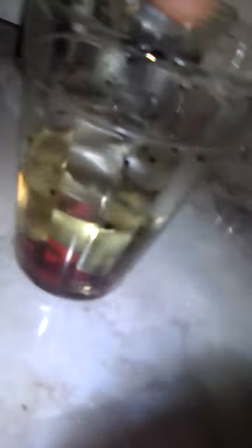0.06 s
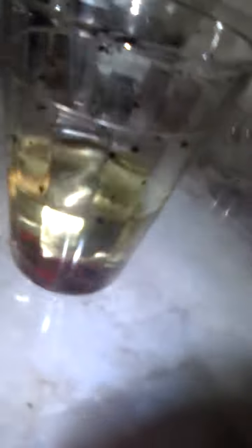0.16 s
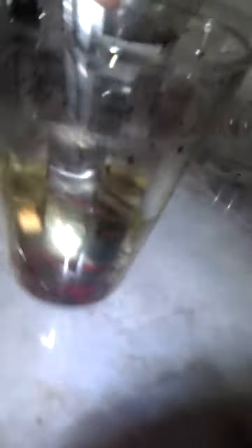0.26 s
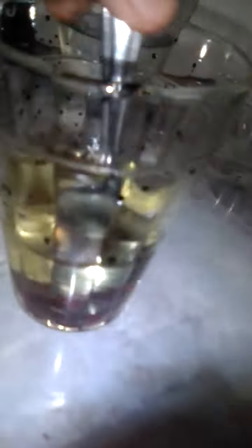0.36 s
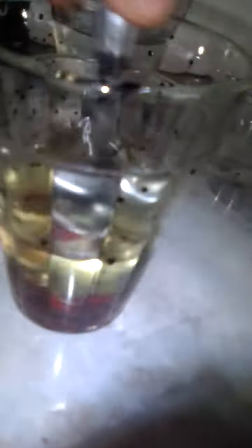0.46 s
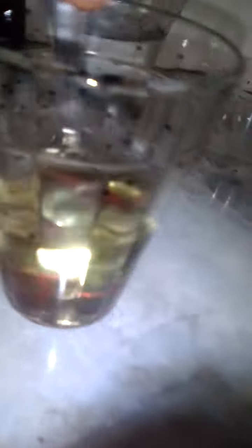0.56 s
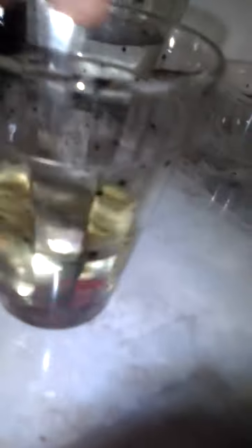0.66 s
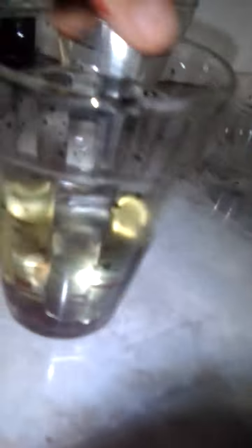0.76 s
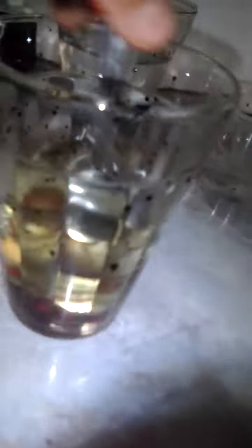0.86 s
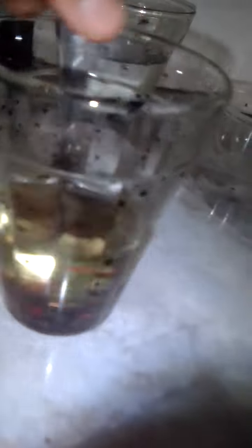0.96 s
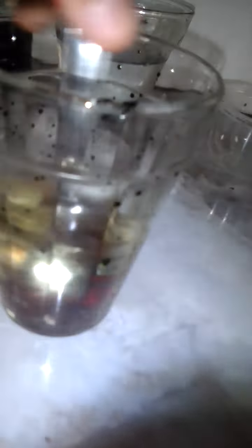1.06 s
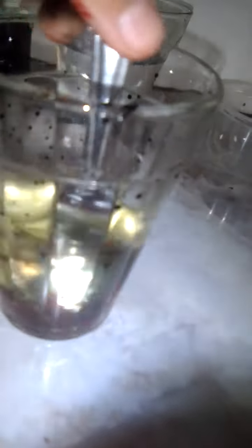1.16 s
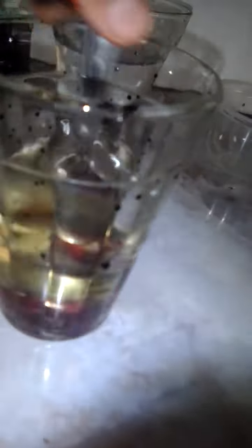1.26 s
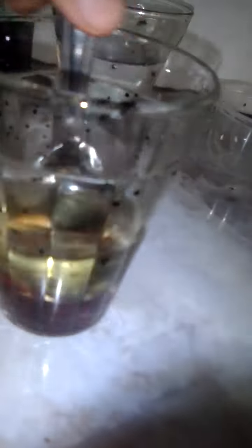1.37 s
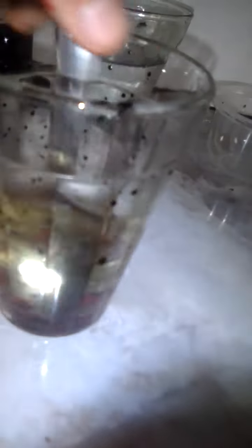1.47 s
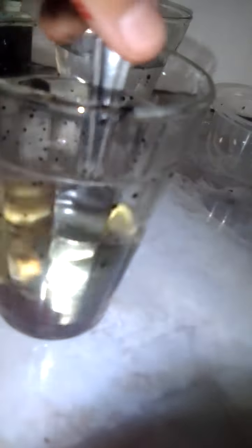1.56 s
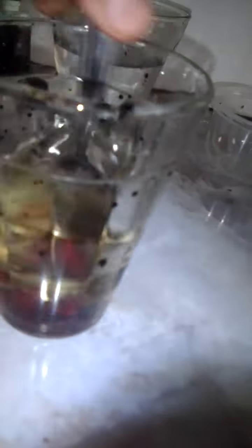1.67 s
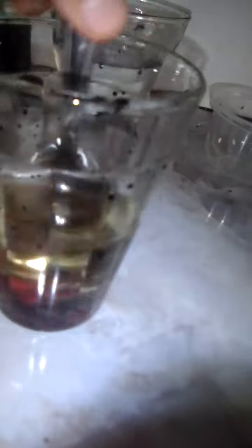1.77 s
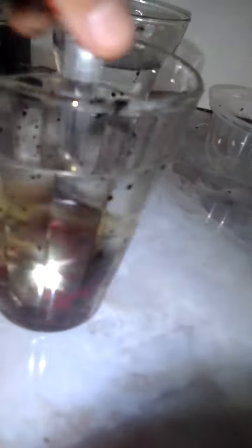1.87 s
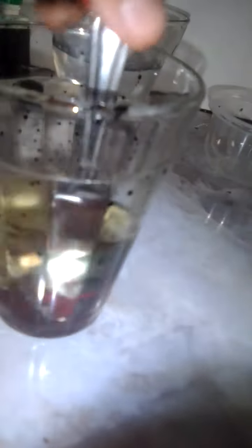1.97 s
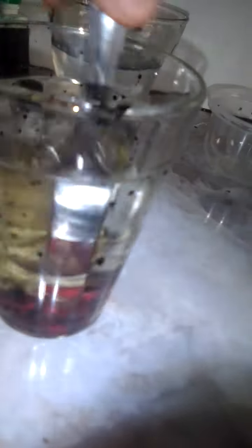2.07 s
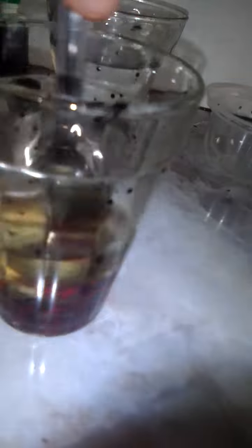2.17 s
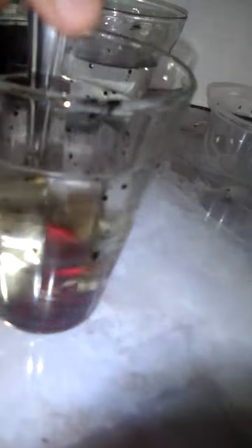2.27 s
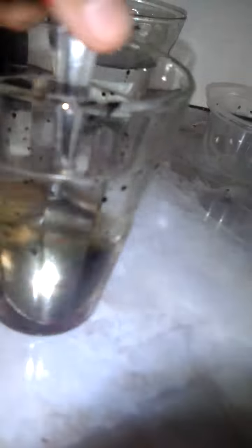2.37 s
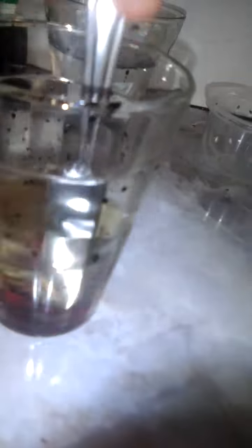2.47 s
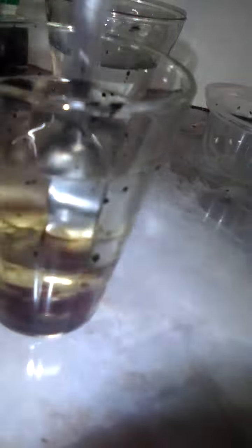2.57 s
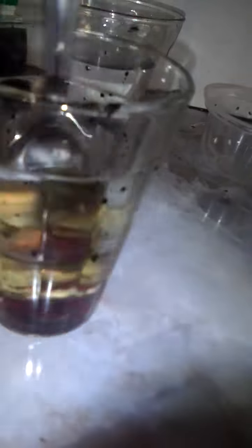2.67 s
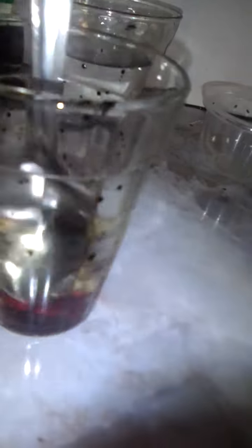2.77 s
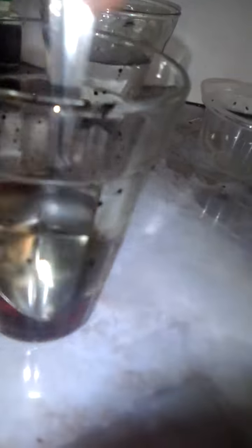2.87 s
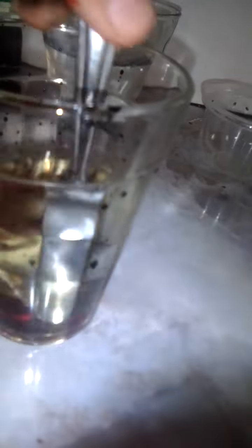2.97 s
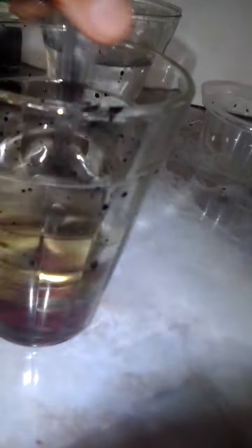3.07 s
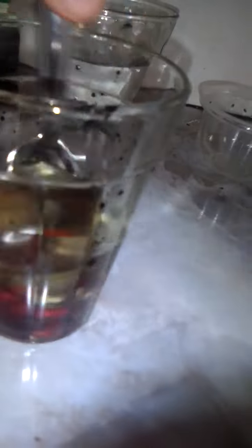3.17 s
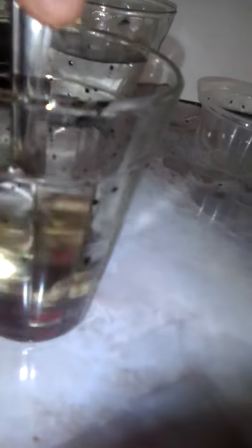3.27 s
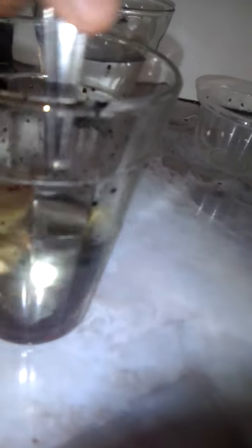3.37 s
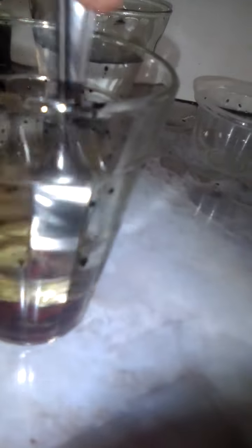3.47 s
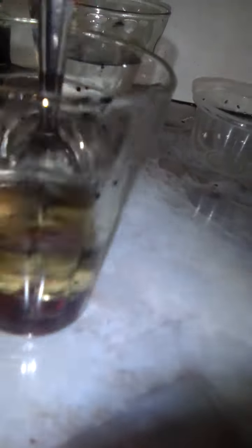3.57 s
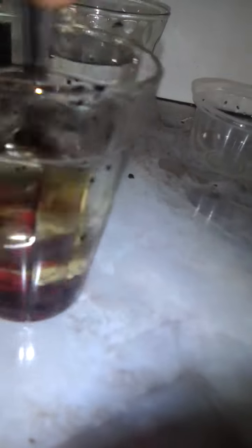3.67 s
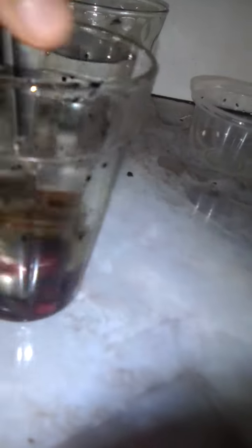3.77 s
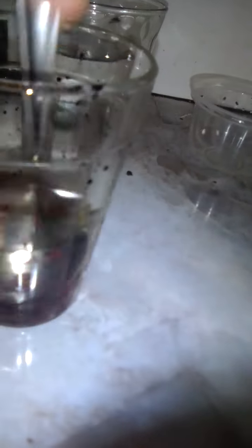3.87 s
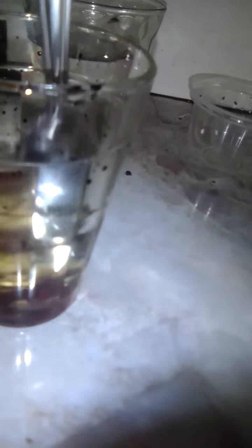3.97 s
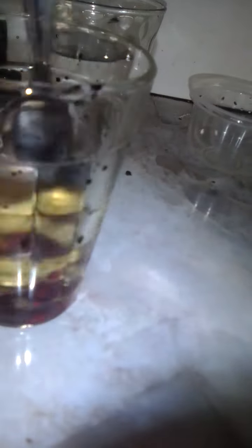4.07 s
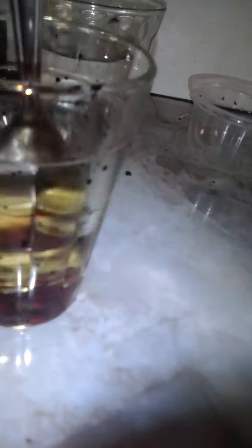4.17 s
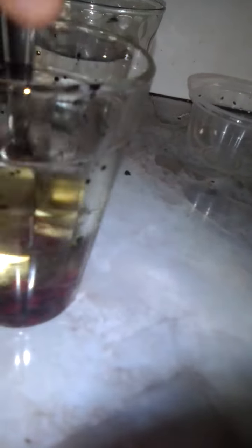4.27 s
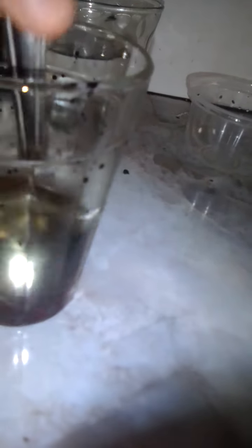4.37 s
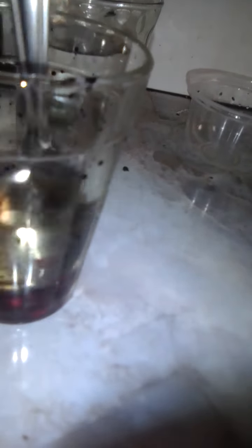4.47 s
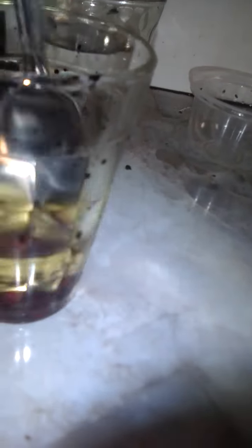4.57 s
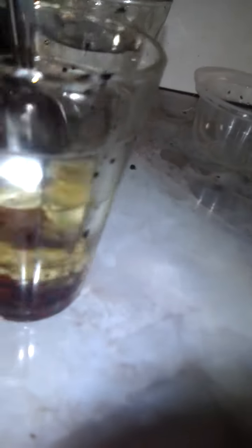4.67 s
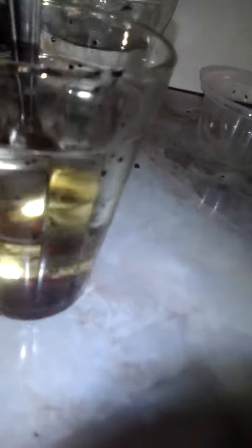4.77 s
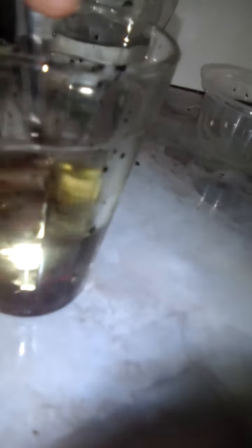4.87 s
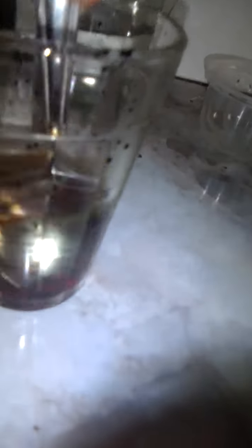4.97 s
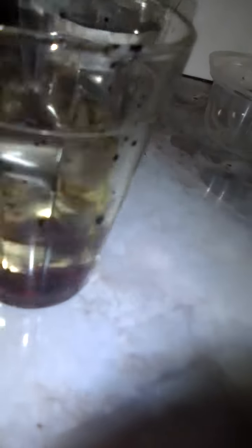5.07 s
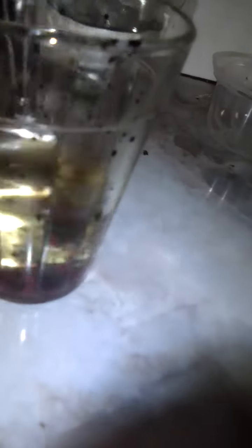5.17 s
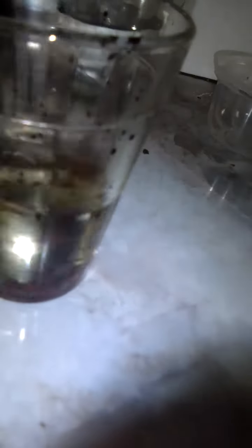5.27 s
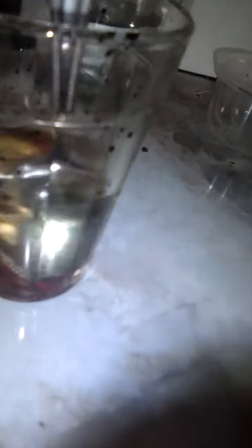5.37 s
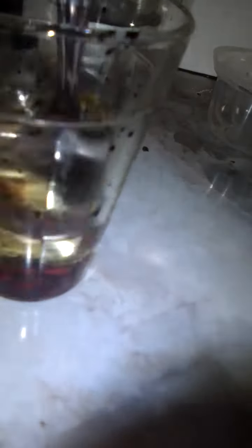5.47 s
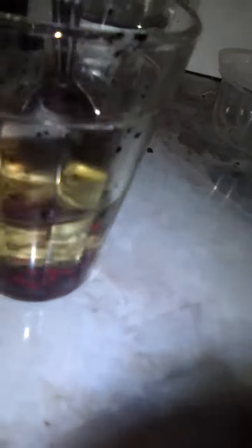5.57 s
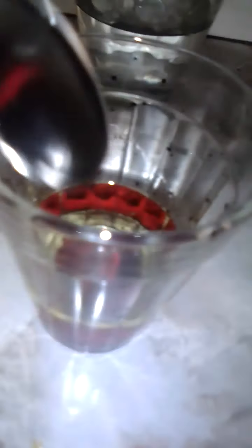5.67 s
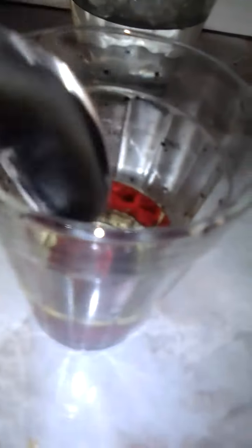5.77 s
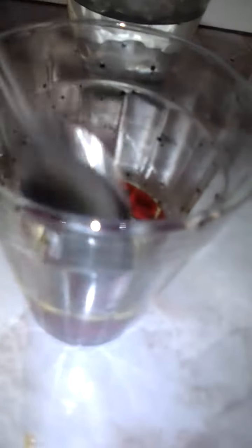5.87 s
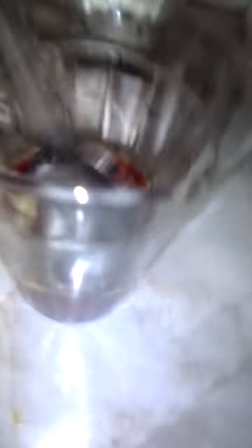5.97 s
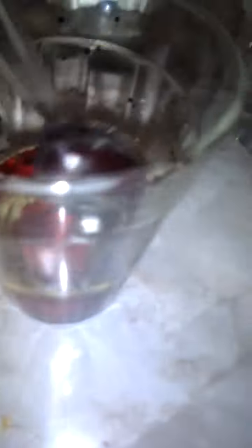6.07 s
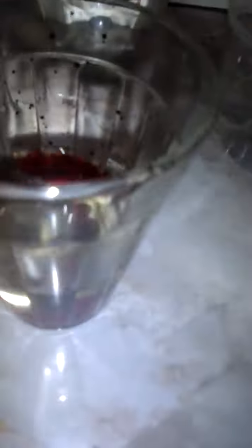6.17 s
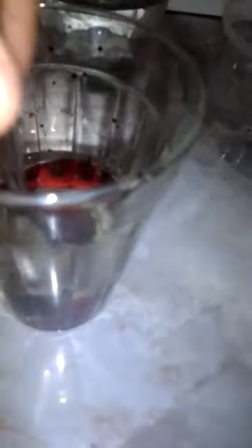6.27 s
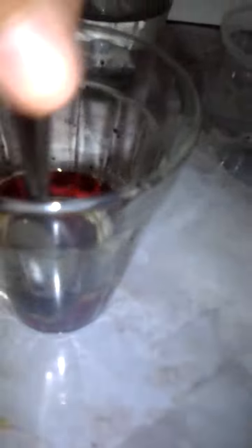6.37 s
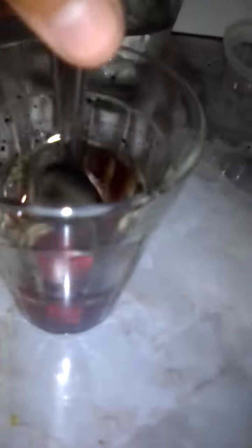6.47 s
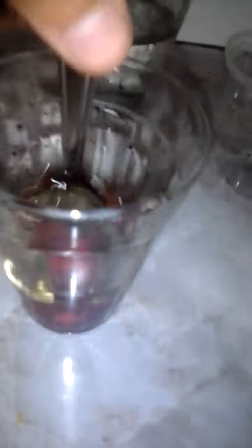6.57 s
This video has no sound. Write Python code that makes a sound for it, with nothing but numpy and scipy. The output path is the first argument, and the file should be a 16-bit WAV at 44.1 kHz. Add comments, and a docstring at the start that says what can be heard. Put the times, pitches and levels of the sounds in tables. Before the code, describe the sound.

A brief scrape opens, then a steel spoon stirs a drink in a thick glass tumbler, making bright, uneven clinks, each with a small knock and a short glassy ring. Clear strikes come at about 0.3, 0.5, 0.8, 1.6 and 2 seconds, with lighter ticks and faint scrapes between. The liquid swirls softly with small plops, most active in the first two seconds, then easing. The sharpest clink lands at 2.9 seconds, followed by others at 3.4 and 3.9, and a tiny, faint squeak near 4.1. Strong clinks return at 4.5, 5.1 and 5.2 seconds, with a soft thump just before 5. A slightly longer scrape near 5.7 seconds leads to final clinks at about 6, 6.3 and 6.6. The sound is close, in a small, slightly reverberant room with quiet background noise and a faint low hum.

```python
"""A brief scrape, then bright, uneven clinks: a steel spoon stirs a drink in a thick tumbler on a table.
Each impact excites the normal modes of both bodies: a short ring of the spoon, a knock of the tumbler
and the longer notes of its wall. Between blows the drink swirls and plops as bubbles resonate, and
stick-slip friction makes the spoon scrape and once squeak. All this sounds close to a phone in a small,
slightly reverberant room, over quiet noise and a low hum."""
import sys
import numpy as np
from scipy import signal
from scipy.fft import rfft, irfft
from scipy.io import wavfile
from scipy.ndimage import uniform_filter1d, minimum_filter1d

SR = 44100
rng = np.random.default_rng(int(sys.argv[2]) if len(sys.argv) > 2 else 0)


def persist_wave(psi):
    """Save psi, clipped to +-1, as 16-bit WAV."""
    counts = np.round(np.clip(psi, -1, 1) * 32767).astype(np.int16)
    wavfile.write(sys.argv[1], SR, np.atleast_2d(counts).T)


N = 291942
TIME = np.arange(N) / SR
AGE = np.arange(int(.42 * SR)) / SR  # time since an excitation, t/s

# vigour of the stirring, easing off: t/s, level/dB
SWIRL = [(0, -52.5), (2.3, -56.5), (4.6, -60.5), (6.62, -61.5)]


def clinks():
    """Impact excitation: the spoon strikes, touches again lightly, and twice thumps the table."""
    # t/s, spoon f/Hz, contact note f/Hz, then level/dB of spoon, knock, low and middle wall notes
    blows = [(0.068, 7390, 1466, -40, -38.5, -71, -44.5), (0.3347, 6690, 3450, -20.5, -46, -44, -32),
             (0.345, 6530, 3430, -29.5, -31.5, -40, -29), (0.501, 7190, 1230, -24, -36, -51, -39.5),
             (0.808, 6533, 5660, -15.5, -26.5, -36, -27), (0.887, 6660, 1660, -41, -52, -59, -56),
             (1.016, 7120, 1770, -44, -50, -52, -45.5), (1.08, 6800, 1240, -47.5, -48.5, -57, -50),
             (1.175, 6720, 2626, -31.5, -28.5, -48, -34), (1.311, 7130, 1772, -51, -48, -52.5, -42.5),
             (1.558, 7040, 3440, -52.5, -37.5, -56, -44.5), (1.603, 6840, 3460, -26, -24, -37, -24.5),
             (1.751, 6630, 2780, -55, -55, -55, -54), (1.9216, 7350, 4880, -31.5, -34.5, -61, -30.5),
             (1.994, 6540, 3260, -17.5, -24.5, -33, -29), (2.433, 6490, 5260, -29.5, -33, -45, -41.5),
             (2.565, 6910, 3690, -38, -59, -60, -44.5), (2.9014, 6600, 5630, -8.5, -30, -34.5, -29.5),
             (3.035, 7300, 1740, -41.5, -53, -78, -42), (3.152, 6640, 1750, -56, -62, -61, -68),
             (3.276, 6530, 5600, -52, -65, -70, -67), (3.433, 6550, 1570, -18, -31.5, -36.5, -35),
             (3.78, 6900, 1750, -58, -55, -60, -58.5), (3.8629, 6610, 5680, -22.5, -55, -55, -36),
             (3.8748, 6600, 1255, -31.5, -23.5, -44, -32), (4.052, 6830, 1600, -50.5, -58, -59, -46),
             (4.329, 5360, 5600, -49, -48, -63, -67.5), (4.369, 7000, 5400, -62, -61.5, -73, -63.5),
             (4.4916, 6560, 5760, -12, -39.5, -39.5, -26), (4.622, 7200, 1770, -59, -57, -69, -66),
             (4.962, 6860, 1563, -34.5, -32, -63.5, -60), (5.0521, 6620, 6000, -15, -43, -45.5, -27.5),
             (5.2024, 6566, 2662, -12, -37, -38, -24), (5.385, 6360, 5420, -32.5, -28, -58, -36.5),
             (5.456, 6740, 987, -38, -52, -61, -49), (5.9959, 6750, 1751, -19.5, -39, -64, -32),
             (6.2572, 6960, 1780, -14.5, -36.5, -35, -14), (6.3267, 7490, 1228, -21.5, -24, -65, -42),
             (6.5749, 6550, 1656, -18, -42, -37.5, -24)]
    thumps = [(1.9214, -47.5), (4.962, -37.5)]  # the spoon lands on the bottom: t/s, level/dB
    table_modes = [(273, 0, 0.13)]  # f/Hz, level/dB, t60/s
    retouch_db = -38
    out = np.zeros(N)
    for s, spoon_hz, contact_hz, *levels_db in blows:
        add(out, s, clink(s, spoon_hz, contact_hz, *levels_db))
        again_s = s + .07 + .07 * rng.random()
        add(out, again_s, clink(again_s, spoon_hz, contact_hz, *np.add(levels_db, retouch_db)))
    for s, db in thumps:
        add(out, s, blow(ring(table_modes, scatter_db=0, detune=0.0091), db))
    return out


def clink(s, spoon_hz, contact_hz, spoon_db, knock_db, low_db, mid_db):
    """Superposition in one impact: steel, tumbler and contact sound briefly, and the wall rings on."""
    force_db = knock_db + .25 * (spoon_db - knock_db)
    # a harder blow is a shorter contact, so its treble grows faster; later blows are brighter too
    growth_db_per_db, brighten_db_per_s = 1.335, 3
    sharp_db = growth_db_per_db * spoon_db + brighten_db_per_s * s
    attack = spoon_ring(spoon_hz, spoon_db) + knock(knock_db) + contact(contact_hz, force_db, sharp_db)
    return attack + wall_ring(s, spoon_db, knock_db, low_db, mid_db, sharp_db)


def spoon_ring(hz, level_db):
    """Bending modes of a bar: grip and depth in the drink set the pitch; the grip varies the damping."""
    bending = [(1, 6.5, 0.78), (1.022, -18, 0.47), (.972, -20.5, 0.51), (1.1, -12.5, 0.97), (.92, -12, 0.5)]  # frequency ratio, level/dB, t60 ratio
    t60 = 0.051 * np.exp(.15 * rng.standard_normal())
    modes = [(hz * ratio, db, t60 * share) for ratio, db, share in bending]
    steel = ring(modes, scatter_db=6, detune=0.0013) * onset(.0004)
    rebound_s = .009 * (.8 + .4 * rng.random())
    rebound = undb(-13) * np.pad(steel, (int(rebound_s * SR), 0))[:len(AGE)]
    return blow(steel + rebound, level_db + .5)


def knock(db):
    """Heavily damped resonance of the tumbler with its drink and the air above it."""
    modes = [(708, 3, 0.03), (677, 2.5, 0.028), (752, -6.5, 0.059), (297, -25, 0.018)]  # f/Hz, level/dB, t60/s
    colour = [(60, -39.5), (150, -32), (260, -2), (520, 1), (720, -1.5), (900, -2), (1150, -3.5),
              (1600, -36)]  # impact noise: f/Hz, level/dB
    body = ring(modes, scatter_db=2, detune=.033) * onset(.004)
    return blow(body, db - 0.5) + blow(burst(colour, t60=0.068, rise_s=0.00028), db - 6.0)


def contact(hz, force_db, sharp_db):
    """A short force pulse excites a broad band; the point of contact favours one damped note."""
    clack_colour = [(500, -31), (950, -6.5), (1280, 7.5), (1600, 1), (2300, 0), (2800, 0), (3350, 4.5),
                    (4200, -1.5), (5300, 3.5), (6200, 4.5), (7400, 7.5), (8200, -25.5), (9500, -36.5),
                    (16000, -48.5)]  # f/Hz, level/dB
    tick_colour = [(3000, -14), (6500, 2.5), (8400, 10), (9500, -9.5), (11000, 5), (13000, -20),
                   (16000, -9)]  # f/Hz, level/dB
    note = blow(ring([(hz, 0, 0.044)], scatter_db=0, detune=0.0023), force_db - 7)
    clack = blow(burst(clack_colour, t60=0.035, rise_s=0.00024), force_db + 0.5)
    tick = blow(burst(tick_colour, t60=0.012, rise_s=.0001), sharp_db - 29)
    return note + clack + tick


def wall_ring(s, spoon_db, knock_db, low_db, mid_db, sharp_db):
    """Shell modes under mass loading: drink heaped by a blow flattens them until it falls away."""
    # modes of the glass, several in close pairs: f/Hz, level/dB, t60/s
    low = [(1735, -3.5, 0.51), (1756, 10, 0.087)]
    middle = [(4552, 0, 0.24), (4538, -0.5, 0.16), (3470, -23.5, 0.15)]
    high = [(7315, -1, .22), (7365, -6, .22), (7170, -6, .13), (6530, 0, .2), (6690, -7, .18)]
    top = [(8480, -1, .12), (10600, -15, .1), (10990, -15, .13)]
    rim = [(1742, 9, 0.062), (2000, 4, 0.02), (2650, -8, 0.049), (3110, -1, .05), (7000, -12, 0.2)]
    groups = [(low, low_db), (middle, mid_db),
              (high, (spoon_db + mid_db) / 2 - 13.5), (top, sharp_db - 32.5)]
    sag = .01 * (1 + .5 * rng.standard_normal()) / (1 + undb(-27 - spoon_db))  # share of the pitch
    if 5.6 < s < 6.3:  # lifted out of the drink, the spoon hits near the rim
        groups.append((rim, mid_db - 2))
        sag = 0
    damping = 1 + undb(knock_db + 9.5)  # a heavy knock presses the spoon against the wall
    notes = [(hz * (1.005 - sag), db + level_db, t60 / damping)
             for modes, level_db in groups for hz, db, t60 in modes]
    return ring(notes, scatter_db=3.5, detune=0.0016, glide=sag) * onset(0.0036)


def drink():
    """Bubble resonance and flow noise: a fine wash swells with each wave, among a few larger plops."""
    plop_events = [(0.408, -42), (0.462, -41), (1.132, -43), (1.485, -39.5), (1.906, -39), (2.37, -46),
                   (2.789, -48.5), (3.639, -38.5)]  # behind the spoon: t/s, level/dB
    sloshes = [(.35, .22, -52), (.67, .13, -50.5), (.88, .4, -54), (2.92, .2, -61.5), (3.65, .16, -48)]  # waves running round the glass: t/s, duration/s, level/dB
    wash_colour = [(100, -27.5), (300, 1), (720, 1), (1000, -1), (1400, -2.5), (2300, -15.0),
                   (5000, -30.5), (12000, -59.0)]  # f/Hz, level/dB
    bubbles, plops, flow = np.zeros(N), np.zeros(N), undb(curve(SWIRL))
    for when, pitch, size in rng.random((900, 3)):
        strength = undb(16 * size ** 3 - 5 * pitch)
        add(bubbles, when * N / SR, strength * bubble(380 * 5 ** pitch, cycles=2.1, glide=0.099))
    for s, db in plop_events:
        plop_hz = 705 * (1 + .04 * rng.standard_normal())
        add(plops, s, blow(bubble(plop_hz, cycles=27, glide=.1), db))
        splash = burst(wash_colour, t60=0.17, rise_s=0.00015)
        add(plops, s, blow(splash, db - 2))
    for s, length, db in sloshes:
        add(flow, s, undb(db) * swell(length, peak_share=.45))
    return flow * (undb(-9) * unit(bubbles) + undb(-7) * noise(wash_colour, size=N)) + plops


def bubble(hz, cycles, glide):
    """A pocket of air is a damped oscillator whose pitch rises as it nears the surface."""
    life = cycles / hz
    t = AGE[:int(life * SR) + 2]
    return np.sin(2 * np.pi * hz * t * (1 + glide * t / life / 2)) * np.exp(-np.log(1000) * t / life)


def scrape():
    """Stick-slip friction: a light touch rings mainly the steel, a firm one also the damped wall."""
    slides = [(0, 0.055, -47.5), (.56, 0.053, -55), (0.938, 0.053, -49), (2.339, 0.05, -54),
              (2.568, 0.052, -48.5), (2.798, 0.025, -51), (3.326, 0.049, -52.5), (3.516, .012, -42),
              (5.661, 0.16, -37.5)]  # t/s, duration/s, level/dB
    # resonances of the rubbed tumbler and spoon: f/Hz, bandwidth/Hz, level/dB
    wall_modes = [(700, 240, 1), (2090, 700, -4), (4640, 190, 5.5), (8520, 300, -15), (11050, 300, -20)]
    steel_modes = [(6700, 260, -4.5), (7240, 220, -4)]
    slips_per_s, firm_db = 1200, -45.5
    unsteady = noise([(1, -4.5), (12, 1), (40, -8), (200, -89.5)], size=N)
    pressure = undb(curve(SWIRL) - 9.5 + 4.5 * unsteady)  # uneven grazing between slides
    for s, length, db in slides:
        add(pressure, s, undb(db) * swell(length, peak_share=0.87))
    slips = pressure * unit((rng.random(N) < slips_per_s / SR) * rng.standard_normal(N))
    firmness = pressure / (pressure + undb(firm_db))
    wall, steel = resonances(wall_modes), resonances(steel_modes)
    spectrum = rfft(slips * firmness) * wall + rfft(slips) * steel
    return irfft(spectrum, N) / np.sqrt(np.mean(np.abs(wall + steel) ** 2))


def squeak():
    """Self-excited oscillation: slips on the wet wall lock into a rising tone that keeps losing grip."""
    start_s, start_hz, rise_hz_per_s = 4.075, 3220, 5500
    grip = swell(.08, peak_share=0.52)
    wobble = noise([(100, 8), (300, 1), (1500, -48)], size=len(AGE))
    stutter = noise([(20, -2), (60, 0), (200, -41)], size=len(AGE))
    hz = (start_hz + rise_hz_per_s * AGE) * (1 + 0.03 * wobble)
    phase = 2 * np.pi * np.cumsum(hz) / SR
    tone = unit(stutter * (np.sin(phase) + undb(-1.0) * np.sin(2 * phase)))
    out = np.zeros(N)
    add(out, start_s, undb(-53) * grip * tone[:len(grip)])
    return out


def room(x):
    """Reverberation: reflections from the table and near walls merge into a short, thin tail."""
    # f/Hz, level/dB
    colour = [(100, 7.5), (700, 0.5), (1500, 6.5), (3500, 1.0), (7000, -6), (10000, -3.5), (16000, -21)]
    tail = burst(colour, t60=0.32, rise_s=0.0033) * (AGE > .003)
    return x + undb(-20) * signal.fftconvolve(x, tail / np.sqrt(np.sum(tail ** 2)))[:N]


def background():
    """Broadband room noise and a low hum in the house, randomly modulated in pitch and amplitude."""
    air_colour = [(15, -52), (25, -24), (145, -4.5), (335, -2.5), (476, -8), (677, -8), (936, -20.5),
                  (1940, -20), (4140, -24), (4740, -21), (6210, -25.5), (16000, -36)]  # f/Hz, level/dB
    hum_levels = [(0, -69.5), (1.6, -60.5), (2.7, -72), (6.62, -72.5)]  # the hum swells and fades back: t/s, level/dB
    waver = noise([(1, 3.5), (6, -5.5), (25, -30), (100, -97.5)], size=N)
    hum_hz = 143 + 3 * waver
    hum = unit(np.sin(2 * np.pi * np.cumsum(hum_hz) / SR) * (1 + 0.33 * waver[::-1]))
    return undb(-59.5) * noise(air_colour, size=N) + undb(curve(hum_levels)) * hum


def ring(modes, scatter_db, detune, glide=0):
    """Free decay of modes (f/Hz, level/dB, t60/s): impact point sets strength, the drink bends pitch."""
    out, rise = 0, glide * (1 - np.exp(-(AGE / 0.11) ** 2))
    for hz, db, t60 in modes:
        size, shift, bend, sign = rng.standard_normal(4)
        pitch_ratio = 1 + rise + detune * (shift + bend * np.sin(2 * np.pi * 7 * AGE))
        phase = 2 * np.pi * hz * np.cumsum(pitch_ratio) / SR
        out = out + np.sign(sign) * undb(db + scatter_db * size) * fade(t60) * np.sin(phase)
    return out


def resonances(modes):
    """Frequency response of parallel modes, each a squared second-order band-pass."""
    f = np.maximum(np.fft.rfftfreq(N, 1 / SR), 1)
    return sum(undb(db) / (1 + 1j * hz / width * (f / hz - hz / f)) ** 2 for hz, width, db in modes)


def burst(colour, t60, rise_s):
    """Modal overlap: damped modes too dense to tell apart sound as decaying noise."""
    return noise(colour, size=len(AGE)) * fade(t60) * onset(rise_s)


def noise(colour, size):
    """Noise of unit RMS, filtered to a spectrum (f/Hz, level/dB)."""
    hz, db = np.transpose(colour)
    f = np.maximum(np.fft.rfftfreq(size, 1 / SR), 1)
    gain = undb(np.interp(np.log(f), np.log(hz), db))
    return unit(irfft(rfft(rng.standard_normal(size)) * gain, size))


def swell(length, peak_share):
    """Envelope of a push that builds to its peak and lets go."""
    t = np.linspace(0, 1, max(int(length * SR), 2))
    return np.sin(np.pi / 2 * np.interp(t, [0, peak_share, 1], [0, 1, 0]))


def onset(rise_s):
    """Exponential approach to full amplitude."""
    return 1 - np.exp(-AGE / rise_s)


def fade(t60):
    """Exponential decay by 60 dB in t60 seconds."""
    return np.exp(-np.log(1000) * AGE / max(t60, 1e-3))


def blow(x, db):
    """Set a short sound's level as if all its energy lay within 15 ms."""
    return x * undb(db) / np.sqrt(np.sum(x ** 2) / (.015 * SR))


def curve(table):
    """Linear interpolation of (t/s, level/dB) points."""
    return np.interp(TIME, *np.transpose(table))


def add(out, s, x):
    """Mix x in at time s."""
    i = max(int(s * SR), 0)
    out[i:i + len(x)] += x[:max(N - i, 0)]


def undb(db):
    """Level to amplitude ratio."""
    return 10 ** (np.asarray(db) / 20)


def unit(x):
    """Scale to unit RMS."""
    return x / np.sqrt(np.mean(x ** 2))


def scene():
    """Superposition in the room; a low cut keeps deep bass out of the clinks, drink and scrapes."""
    tumbler = clinks() + drink() + scrape() + squeak()
    tumbler = signal.sosfilt(signal.butter(2, 150, "high", fs=SR, output="sos"), tumbler)
    return (room(tumbler) + background())[None]


def record(dry):
    """Peak limiting in the phone holds down the hardest blows; a low-pass cuts the top."""
    ceiling, top_hz = .75, 16000
    gain = np.minimum(1, ceiling / (np.abs(dry) + 1e-9))
    gain = uniform_filter1d(minimum_filter1d(gain, size=65), size=65)
    return signal.sosfilt(signal.ellip(8, .2, 70, top_hz, fs=SR, output="sos"), dry * gain)


dry = scene()
out = record(dry)
persist_wave(out)
```